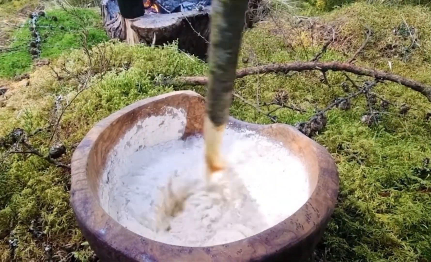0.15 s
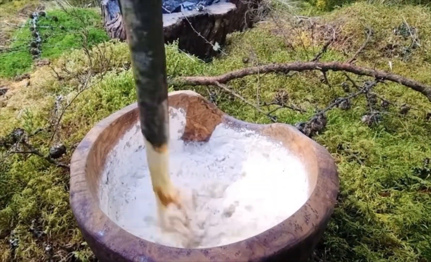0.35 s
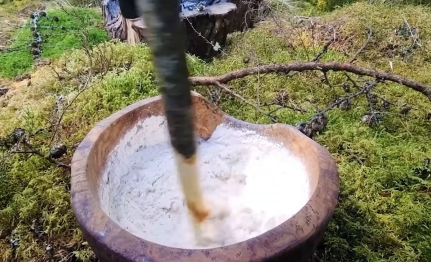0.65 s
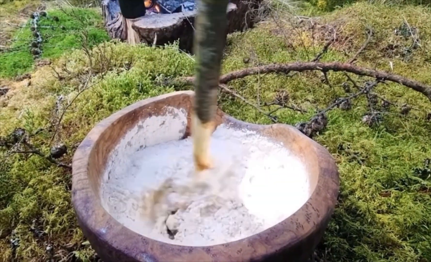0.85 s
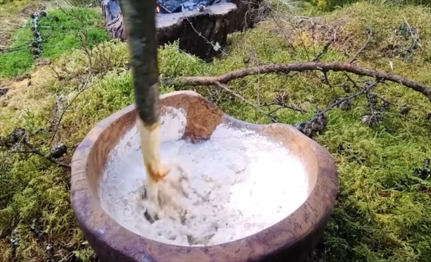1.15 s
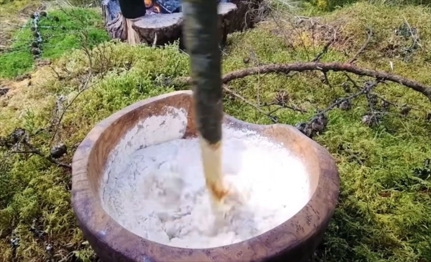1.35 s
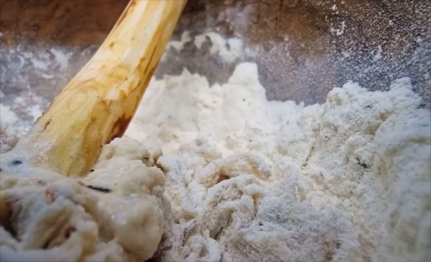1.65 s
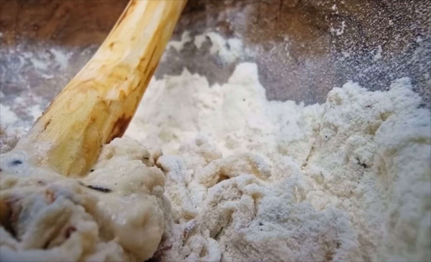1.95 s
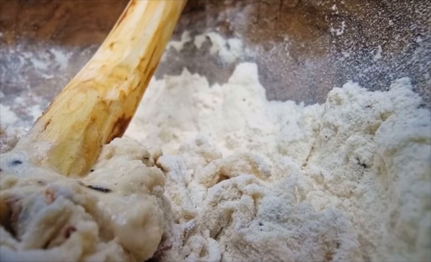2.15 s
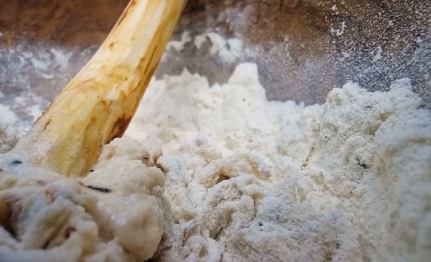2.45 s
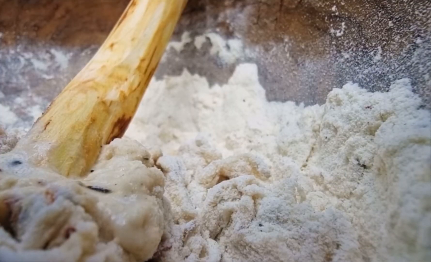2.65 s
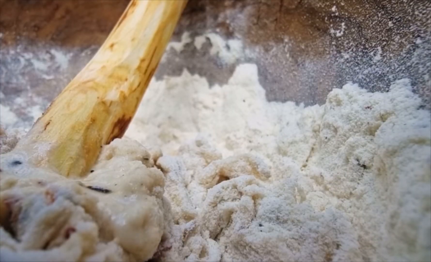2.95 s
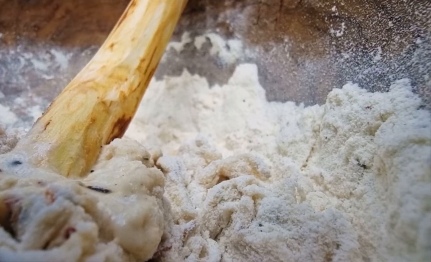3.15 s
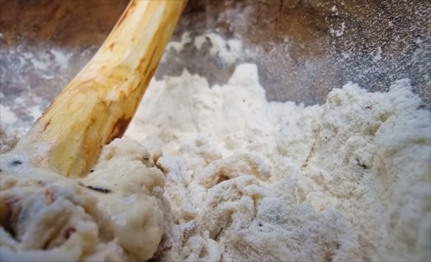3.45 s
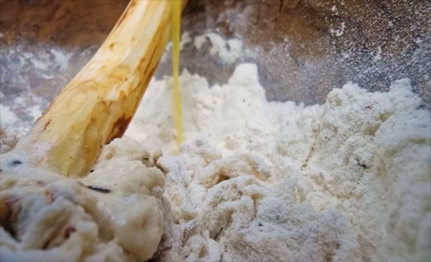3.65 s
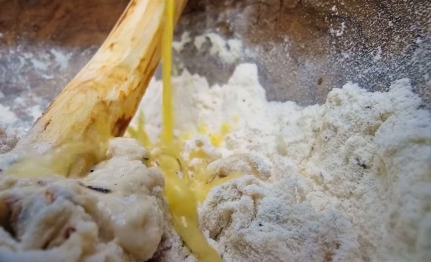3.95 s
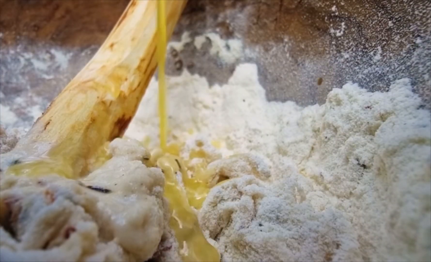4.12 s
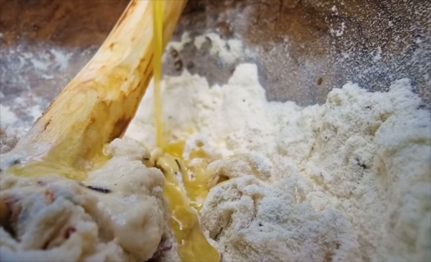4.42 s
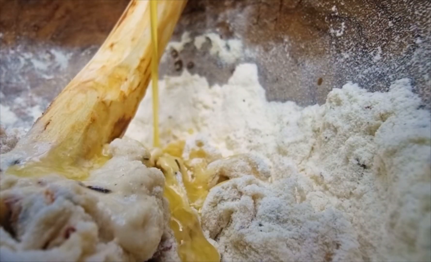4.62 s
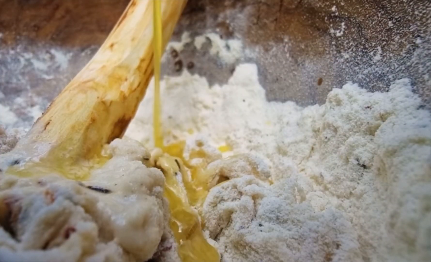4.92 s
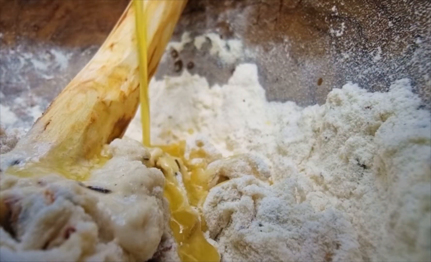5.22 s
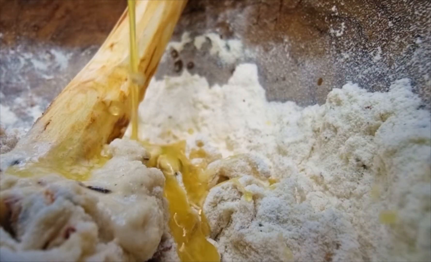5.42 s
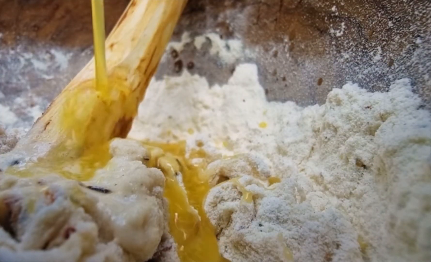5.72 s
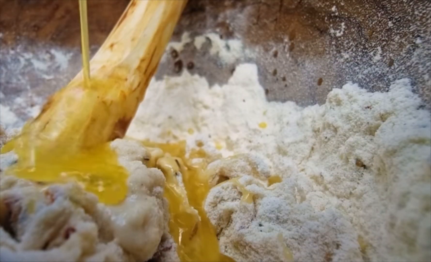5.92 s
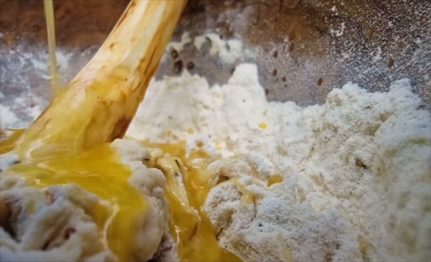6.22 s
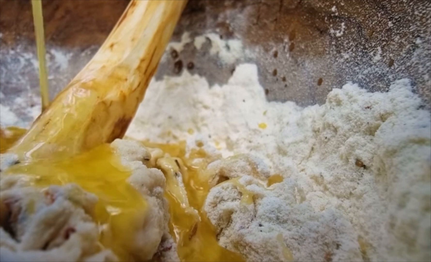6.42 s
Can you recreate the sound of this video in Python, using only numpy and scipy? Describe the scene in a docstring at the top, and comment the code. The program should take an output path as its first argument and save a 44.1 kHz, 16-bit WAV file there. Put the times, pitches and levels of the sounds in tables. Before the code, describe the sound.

A close, wide stereo scene outdoors, with a soft low hum and thin airy hiss. From 0 to 1.7 s a stick drags through sticky batter in a wooden bowl a little left: wet crackles, short scrapes and woody smacks, the strongest near 0.45 s. Faint gliding bird chirps gather between 1.2 and 1.7 s. At 1.72 s the stirring stops abruptly, and the hum drops. Sparse moist pops with a thin hollow ring follow, thickening after 2.4 s. Brighter birds chirp from about 3.1 to 3.8 s. Around 3.7 s liquid surges with quick low gulps, peaking in a hard wet pop at 3.95 s. Crackling, splattering and glugging continue slightly right, busy from 4.3 to 5.5 s, with a sharp snap at 5.3 s. After 5.8 s it thins to isolated pops and light wet trickling until about 6.6 s.

```python
"""Sticky crackles and wooden smacks come first: a stick stirs batter in a wooden bowl outdoors, a little left of
a spaced microphone pair. At 1.72 s the scene changes to liquid running from a hollow vessel on the right, with pops
and gulps. Small birds chirp over a low hum. Clicks and noise bursts ring the bowl and vessel as banks of modes,
gulps are rising sines, birds are gliding sines, and hum and hiss are shaped noise."""
import sys
import numpy as np
from scipy import signal
from scipy.fft import rfft, irfft, next_fast_len
from scipy.io import wavfile
from scipy.ndimage import uniform_filter1d

SR = 44100
rng = np.random.default_rng(int(sys.argv[2]) if len(sys.argv) > 2 else 0)


def master_out(mix):
    """Clip the mix to full scale and print it as 16-bit PCM to the path in sys.argv[1]."""
    frames = np.transpose(np.atleast_2d(mix))
    ceiling = np.clip(frames, -1, 1)
    pcm = np.round(ceiling * 32767).astype(np.int16)
    wavfile.write(sys.argv[1], SR, pcm)


def voltage_ratio(level):
    """Linear amplitude factor for a level in decibels (scalar or array-like)."""
    return 10 ** (np.asarray(level, float) / 20)


N = 290178
CHANGE_S = 1.72  # stirring stops and pouring starts
SPLAT_WIDTH_HZ = 1600  # width of each resonance that gives a pop its own pitch

# Distant air, shape of its spectrum: [f/Hz, relative density/dB per Hz]
AIR_SPECTRUM = [(20, -25.5), (40, -2.5), (75, 12), (110, 4.5), (170, -3.5), (300, -29.5), (600, -19),
                (1100, -18), (2000, -33), (3200, -29.5), (7000, -29), (10000, -46), (13000, -42),
                (16000, -36)]
# Gains of the air's two parts over time: [t/s, hum gain/dB, hiss gain/dB]
AIR_GAINS = [(0, -52.5, -41.5), (1.698, -51, -41.5), (1.74, -56.5, -42), (3.9, -58.5, -52),
             (4.1, -65.5, -39.5), (5.6, -61.5, -46.5), (6.58, -58.5, -41)]
# How alike the air is at the two microphones: [f/Hz, likeness 0..1]
AIR_LIKENESS = [(40, 0.45), (110, 1), (300, 0.02), (1000, 0.012)]
# Arched notes of a songbird: [t/s, length/s, top f/Hz, starting level/dB]
BIRD_ARCHES = [(1.162, 0.059, 4250, -52.5), (1.225, 0.066, 3077, -50), (1.338, 0.065, 4210, -51),
               (1.389, 0.047, 3100, -45.5), (1.504, 0.078, 3910, -54), (1.551, 0.085, 2965, -53),
               (1.632, 0.046, 3880, -50), (1.686, 0.026, 3640, -46), (3.133, 0.057, 4550, -35.5),
               (3.175, .04, 4240, -38), (3.184, 0.061, 3390, -47), (3.309, 0.06, 4630, -30.5),
               (3.348, 0.049, 4200, -40), (3.342, 0.037, 3300, -43), (3.495, 0.044, 4390, -33),
               (3.544, 0.039, 3350, -41), (3.763, 0.072, 3560, -37)]
# Straight gliding whistles: [t/s, length/s, start f/Hz, end f/Hz, level/dB]
BIRD_WHISTLES = [(0.782, 0.012, 6550, 5880, -49.5), (0.9, 0.034, 6680, 5550, -53),
                 (1.338, 0.11, 6820, 7160, -55.5), (1.614, 0.023, 6050, 5730, -51.5),
                 (1.642, .02, 4820, 4730, -53), (1.694, 0.017, 5000, 4680, -51),
                 (1.697, 0.012, 4000, 3950, -51), (2.471, 0.081, 4250, 4400, -50.5),
                 (2.66, 0.049, 4540, 4300, -57), (2.693, 0.028, 4900, 5100, -62),
                 (2.88, 0.041, 4400, 4100, -52), (3.441, 0.03, 4920, 4870, -46),
                 (3.642, 0.035, 2194, 3570, -37), (3.663, 0.043, 3625, 3560, -37),
                 (5.855, 0.058, 7250, 7900, -68)]
# Large gulps of air into the vessel: [t/s, peak level/dB, starting f/Hz]
LARGE_GULPS = [(3.716, -33.5, 465), (3.744, -33.5, 440), (3.79, -22, 466), (3.874, -27, 457),
               (3.944, -29, 190), (4.115, -30.5, 477), (4.363, -36, 260), (4.382, -29, 245),
               (4.399, -27, 317), (4.457, -42, 270), (4.474, -37, 250), (4.508, -35, 216),
               (4.528, -30.5, 261), (4.554, -36.5, 223), (4.765, -44, 250), (4.926, -36, 236),
               (4.956, -35.5, 220), (5.057, -40, 530), (5.064, -34, 250), (5.1, -39, 190),
               (5.143, -38, 257), (5.309, -32.5, 500), (5.83, -42, 240)]
# Batter dragged by the stick: [t/s, crackle level/dB, low slosh level/dB, treble fizz level/dB]
BATTER_LEVELS = [(0, -51, -59, -62), (.03, -46.5, -50.5, -57), (.21, -59.5, -58, -63),
                 (.34, -58.5, -59.5, -69), (.412, -48, -43.5, -60), (.474, -49, -57, -46.5),
                 (.546, -61, -58, -70), (.59, -52, -55, -63), (.742, -63.5, -56.5, -67),
                 (.808, -46.5, -53.5, -61), (.886, -61, -59, -69), (.93, -55.5, -57, -62.5),
                 (1.298, -56.5, -56.5, -66), (1.418, -53, -55, -62.5), (1.72, -55, -50.5, -68)]
# Stream leaving the vessel: [t/s, crackle level/dB, low slosh level/dB, treble fizz level/dB]
STREAM_LEVELS = [(1.76, -66, -60, -77), (2.0, -63.5, -60, -67.5), (2.07, -66, -55, -70),
                 (2.12, -49.5, -63, -62), (2.2, -63, -56.5, -65), (2.36, -59.5, -60, -69),
                 (2.6, -50, -56.5, -54.5), (2.84, -53.5, -57.5, -64), (2.96, -45, -57, -52),
                 (3.2, -46.5, -56, -55), (3.44, -41, -56, -50), (3.66, -43.5, -54, -50),
                 (3.74, -35.5, -43.5, -44.5), (3.92, -32, -44, -42.5), (4.0, -45.5, -56, -57.5),
                 (4.12, -41, -48, -43.5), (4.26, -43, -52, -55.5), (4.36, -35.5, -48, -42),
                 (4.6, -39, -47.5, -46), (4.85, -43.5, -48.5, -51), (5.3, -46.5, -51, -51.5),
                 (5.44, -37.5, -47, -43.5), (5.53, -47, -56, -51.5), (5.64, -49.5, -50.5, -54),
                 (5.78, -49.5, -50.5, -61), (5.87, -60, -61.5, -64.5), (6.04, -50, -53.5, -57.5),
                 (6.21, -53.5, -58, -63.5), (6.44, -50, -46.5, -52), (6.58, -51, -56, -58)]
# Stick smacking free: [t/s, snap level/dB, snap f/Hz, hollow ring level/dB, treble level/dB]
SMACKS = [(0.0425, -54, 3300, -52, -53), (0.084, -55, 3000, -48, -60), (0.1455, -61, 3500, -54, -62),
          (0.3067, -45, 2860, -47, -56), (0.3175, -50, 2700, -53, -65), (0.3735, -57, 3500, -40, -60),
          (0.3895, -48, 6500, -55, -58), (0.404, -37, 5350, -46, -50), (0.414, -44, 2800, -40, -48),
          (0.4533, -30, 6100, -32, -29.5), (0.6162, -45, 2960, -46, -63), (0.8057, -39.5, 3180, -62, -53),
          (0.896, -50, 5800, -66, -46), (0.9387, -38, 5750, -50, -55), (1.36, -54, 3000, -38, -68),
          (1.5444, -43, 6300, -62, -40)]
# Wet pops in the stream: [t/s, snap level/dB, snap f/Hz, hollow ring level/dB, treble level/dB]
STREAM_POPS = [(1.8066, -44, 3330, -44, -57), (1.9086, -46.5, 5100, -66, -71),
               (1.9696, -39, 4690, -49, -74), (2.035, -44, 5800, -56, -67), (2.0917, -41.5, 7400, -44, -42),
               (2.1136, -34, 3300, -57, -52), (2.165, -40.5, 5840, -55, -55), (2.1989, -54, 3060, -63, -46),
               (2.2473, -47, 6700, -62, -62), (2.2726, -44.5, 3160, -59, -71),
               (2.3256, -53, 3600, -56, -46), (2.36, -40.5, 7300, -40, -64), (2.374, -27.5, 3800, -46, -53),
               (2.3944, -44, 3160, -60, -53), (2.4396, -38.5, 3080, -54, -70),
               (2.4883, -35.5, 2970, -35.5, -45), (2.5095, -35, 3260, -47, -43),
               (2.5245, -35, 3100, -33.5, -50), (2.612, -42, 2860, -35, -47), (2.7247, -40, 2960, -38, -37),
               (2.736, -47, 2880, -61, -61), (2.7928, -44, 3000, -38.5, -38), (2.805, -44, 2440, -57, -61),
               (2.8812, -32.5, 6740, -36, -52), (2.948, -51, 2960, -36, -52),
               (2.997, -36.5, 7040, -37, -53), (3.058, -35.5, 2300, -39, -49),
               (3.076, -36.5, 2300, -47, -41), (3.1023, -33.5, 7000, -50, -51),
               (3.2174, -27, 7040, -42, -58), (3.2317, -27.5, 3700, -50, -68),
               (3.2396, -37, 3180, -50, -68), (3.262, -30.5, 6940, -30.5, -65),
               (3.411, -42, 7450, -48, -50), (3.428, -36, 2480, -53, -48), (3.479, -33, 6500, -33.5, -54),
               (3.571, -42, 6500, -52, -57), (3.7524, -32, 3700, -39, -36), (3.768, -27, 3280, -42, -27.5),
               (3.786, -31, 2880, -29, -40), (3.7945, -34, 3600, -31, -39), (3.8225, -34, 5500, -48, -35),
               (3.8525, -37, 4000, -33, -38), (3.8813, -23.5, 3900, -24.5, -37),
               (3.887, -32, 5000, -46, -35), (3.9145, -39, 3500, -39, -34),
               (3.9468, -11, 3870, -19.5, -25.5), (4.1684, -33.5, 3800, -37, -63),
               (4.288, -48, 7400, -50, -36), (4.2999, -27, 3800, -27, -37), (4.363, -33, 7600, -32, -27),
               (4.3834, -36, 3600, -26.5, -24.5), (4.3996, -20, 3730, -45, -27.5),
               (4.412, -35, 5000, -44, -42), (4.445, -27, 5540, -55, -42), (4.4571, -20, 4050, -27.5, -29),
               (4.474, -35, 2330, -56, -30), (4.5086, -30, 4570, -29.5, -29),
               (4.5292, -25.5, 2380, -36, -29), (4.5517, -35, 3560, -30, -38),
               (4.5718, -31, 4430, -42, -24.5), (4.5994, -30, 3570, -50, -38),
               (4.6142, -30.5, 2390, -43, -38), (4.6713, -44, 2370, -51, -40),
               (4.7073, -34.5, 2430, -53, -53), (4.7348, -21, 2560, -28.5, -62),
               (4.745, -31, 3060, -53, -53), (4.764, -29, 5660, -36, -33), (4.8247, -31.5, 5660, -48, -42),
               (4.8524, -34, 2900, -57, -33), (4.8758, -27, 6640, -33, -30),
               (4.8865, -34.5, 2400, -40, -24.5), (4.9056, -29.5, 6400, -32, -30),
               (4.9506, -51, 7450, -36, -23.5), (4.9631, -30, 3540, -53, -48), (5.017, -34, 3300, -45, -39),
               (5.0274, -34, 3830, -29, -43), (5.041, -36, 3000, -38, -55), (5.0525, -41, 7500, -52, -42),
               (5.0614, -24, 3550, -22.5, -27.5), (5.0996, -36, 4150, -52, -47),
               (5.111, -33, 6500, -57, -53), (5.1344, -31, 3000, -50, -56),
               (5.1452, -22.5, 5250, -26, -27.5), (5.2051, -50, 2900, -27.5, -58),
               (5.26, -36, 3700, -44, -55), (5.289, -35, 3000, -33, -44), (5.314, -14.5, 6500, -32, -58),
               (5.3307, -32, 5300, -59, -39), (5.348, -32, 7350, -53, -45), (5.3875, -23, 5370, -42, -32.5),
               (5.394, -42, 3000, -32, -55), (5.4164, -26, 5550, -50, -39), (5.4372, -24, 4100, -52, -46),
               (5.446, -22.5, 3980, -50, -47), (5.461, -26.5, 3850, -37, -53),
               (5.487, -28.5, 4300, -51, -33), (5.5, -33, 3500, -50, -55), (5.5149, -30, 3970, -34, -57),
               (5.5268, -28.5, 6600, -49, -37), (5.629, -40, 5200, -48, -54), (5.6425, -31, 5250, -30, -27),
               (5.664, -41, 3500, -37, -43), (5.705, -54, 3000, -43, -59), (5.7374, -37, 5970, -58, -38.5),
               (5.7636, -34, 3950, -40, -45), (5.7745, -42, 4500, -57, -46), (5.7992, -53, 2800, -38, -44),
               (5.8175, -39, 3100, -39, -44), (5.9841, -43, 2920, -36.5, -54),
               (5.9907, -33, 3040, -34, -38), (6.2604, -46.5, 2400, -29.5, -61),
               (6.274, -38, 2930, -35.5, -61), (6.3581, -38.5, 3970, -60, -56),
               (6.3781, -40, 3700, -47, -31.5), (6.4042, -45, 2950, -35, -45),
               (6.435, -39, 5330, -32.5, -36.5)]
# Modes of the wooden bowl: [f/Hz, width/Hz, relative level/dB]
BOWL_MODES = [(278, 990, -31), (563, 118, 5), (1192, 115, -4.5), (2010, 1350, -4.5), (3330, 1010, 4.5),
              (4100, 1640, 3.5), (6500, 3800, 0.5), (10500, 5970, 4), (11830, 7500, 3)]
# Modes of the hollow vessel: [f/Hz, width/Hz, relative level/dB]
VESSEL_MODES = [(233, 2950, -4), (540, 130, -9), (900, 200, -16), (1025, 60, 2), (1130, 200, -15),
                (1580, 150, -14), (2330, 484, -7), (2800, 287, 4.5), (3300, 658, 1), (4060, 1024, 0),
                (5100, 760, -2), (6650, 1370, -7.5), (11980, 1280, -18), (13170, 2680, -19)]
# Bands of crackle, hollow ring, slosh and fizz, one row each: [lower f/Hz, upper f/Hz]
PART_BANDS = [(1850, 8500), (860, 1750), (110, 820), (8500, 16000)]
# Drifting band and thin ring as the vessel tips: [t/s, band f/Hz, band level/dB, thin ring level/dB]
MOUTH_DRIFT = [(1.72, 2310, -10, 5), (2.45, 2220, -20, 9.5), (2.8, 1320, 2, -8), (3.6, 1330, 0, -33),
               (3.75, 1630, 11, -24), (4.3, 1640, 3.5, -32), (4.6, 2390, 4, -32), (5.05, 2400, 0.5, -25),
               (5.4, 1560, 6, -23), (5.75, 1930, 1, -21), (6.58, 1960, -2, -15)]
# Phase by which the left microphone leads (negative: lags), by source place: [f/Hz, phase/rad]
BOWL_PHASE = [(0, 0.75), (1380, 3.06), (2930, 5.44), (16400, 31)]
VESSEL_PHASE = [(0, 0), (600, -.6), (930, -2.9), (1050, -2.7), (1200, -2.6), (1400, -3.1), (1900, -3.2),
                (2030, -6), (2420, -6.5), (2620, -9.1), (3220, -9.7), (3650, -12.1), (4150, -13),
                (6290, -21.6), (10100, -38), (16400, -58)]
BIRD_PHASE = [(0, 1.5), (16400, -17)]
# Gain of the left microphone for the vessel: [f/Hz, left-right level/dB]
VESSEL_LEFT_GAIN = [(60, 29), (180, -6.5), (550, 2), (760, 4), (1000, 1), (1800, 2), (2500, -1.5),
                    (4970, -1.5), (15000, -2.5)]


def evened(x):
    """Scales to rms 1."""
    return x / np.sqrt(np.mean(x ** 2) + 1e-20)


def read(points, hz):
    """Reads a spectrum on a log-frequency axis."""
    f, value = np.transpose(points)
    return np.interp(np.log(hz + 1), np.log(f + 1), value)


def add(mix, s, sound):
    """Mixes a sound in at time s."""
    part = mix[..., max(round(s * SR), 0):][..., :sound.shape[-1]]
    part += sound[..., :part.shape[-1]]


def to_pair(x, lead, scatter_db, scatter_s, scatter_hz, balance=((0, 0), (1, 0)), count=11):
    """Spaced pair: path difference as phase, and separate treble reflections that shift as things move."""
    t = np.arange(0, scatter_s, 1 / SR)
    echoes = rng.standard_normal((count, 2, len(t)))
    echoes *= voltage_ratio(-60 * t / scatter_s) * (t > .0003)
    highpass = signal.butter(6, scatter_hz, "highpass", fs=SR, output="sos")
    echoes = signal.sosfilt(highpass, echoes)
    echoes *= voltage_ratio(scatter_db) / np.linalg.norm(echoes, axis=2, keepdims=True)
    place = np.arange(N) / SR / .018 % count  # one set of reflections hands over to the next every 18 ms
    heard = x
    for k, taps in enumerate(echoes):
        distance = np.minimum(abs((place - k + 1) % count - 1), 1)
        share = np.cos(np.pi / 2 * distance)
        heard = heard + signal.oaconvolve(x * share, taps, axes=1)[:, :N]
    size = next_fast_len(N)
    hz = np.fft.rfftfreq(size, 1 / SR)
    turn = np.exp(1j * np.interp(hz, *np.transpose(lead))) * voltage_ratio(read(balance, hz))
    left = irfft(rfft(heard[0], size) * turn, size)[:N]
    return np.array([left, heard[1]])


def air():
    """Distant low hum and outdoor hiss: shaped noise, lumpy in time and frequency, partly alike at both mics."""
    frames, hz = N // 512 + 5, np.fft.rfftfreq(2048, 1 / SR)
    a, b, c, d, lumps = rng.standard_normal((frames, len(hz), 5)).T
    lumps_db = 1.6 * evened(uniform_filter1d(uniform_filter1d(lumps, 6, 0), 6, 1))
    same = np.clip(read(AIR_LIKENESS, hz), -1, 1)[:, None]
    left = a + 1j * b
    right = same * left + np.sqrt(1 - same ** 2) * (c + 1j * d)
    z = np.array([left, right]) * voltage_ratio(read(AIR_SPECTRUM, hz)[:, None] + lumps_db)
    low = (hz < 200)[:, None]
    hum, hiss = (signal.istft(z * part, nperseg=2048, noverlap=1536)[1][:, :N] for part in (low, ~low))
    s, hum_db, hiss_db = np.transpose(AIR_GAINS)
    t = np.arange(N) / SR
    both = voltage_ratio(np.interp(t, s, hum_db)) * hum + voltage_ratio(np.interp(t, s, hiss_db)) * hiss
    return both / np.std(hum + hiss) * voltage_ratio([[.6], [-.6]])  # left a little louder


def birds():
    """Short gliding whistles, a little hoarse, blurred by echoes among the trees."""
    scoop, rise = 0.1516, 0.145  # starts this share below the top, climbs in this share of its length
    rest_hz, bend, fade_db = 3000, 1.4, -8  # then sinks to rest_hz and fades
    notes = []
    for s, length, top_hz, db in BIRD_ARCHES:
        u = np.arange(0, length, 1 / SR) / length
        climb_hz = top_hz * (1 - scoop * np.exp(-u / rise))
        notes.append((s, db + fade_db * u, climb_hz - (top_hz - rest_hz) * u ** bend))
    for s, length, start_hz, end_hz, db in BIRD_WHISTLES:
        notes.append((s, db, np.linspace(start_hz, end_hz, round(length * SR))))
    out = np.zeros(N)
    for s, db, hz in notes:
        tone = np.sqrt(2) * np.sin(2 * np.pi * np.cumsum(hz) / SR)
        add(out, s, voltage_ratio(db) * tone * signal.windows.tukey(len(hz), .4))
    flutter = uniform_filter1d(uniform_filter1d(rng.standard_normal(N), 35), 30)
    hoarse = 1 + 0.45 * evened(flutter)
    return to_pair(np.array([out, out]) * hoarse, BIRD_PHASE, scatter_db=1.5, scatter_s=0.12, scatter_hz=1490)


def gulps():
    """Large bubbles, and many small ones that follow the slosh: a soft low ring that rises near the surface."""
    plops, lowest_hz, highest_hz = 260, 135, 416  # small gulps at chance times
    when, pitch, size = rng.random((plops, 3)).T
    when = CHANGE_S + when * (N / SR - CHANGE_S)
    slosh_db = np.interp(when, *np.transpose(STREAM_LEVELS)[[0, 2]])
    small_db = slosh_db - 3.5 - 8.5 * np.log(1 - size) / 2  # a few are much louder
    small_hz = lowest_hz * (highest_hz / lowest_hz) ** pitch
    # the last column is the time to the peak, in s
    rows = [(*row, 0.0013) for row in LARGE_GULPS] + list(zip(when, small_db, small_hz, plops * [0.00056]))
    out, t = np.zeros((2, N)), np.arange(3000) / SR
    pan_db = -5.5 * np.array([[.5], [-.5]])  # right louder
    for (s, db, hz, swell_s), turn in zip(rows, rng.uniform(-3.1, 2.16, (len(rows), 2, 1))):
        swell = t / swell_s * np.exp(1 - t / swell_s)
        tone = np.sin(2 * np.pi * hz * t * (1 + 8 * t) + turn)
        add(out, s, voltage_ratio(db + pan_db) * swell * tone)
    return signal.sosfilt(signal.butter(2, 60, "highpass", fs=SR, output="sos"), out)


def ring(hz, width_hz, size=2048):
    """One dying mode whose spectrum peaks at gain 1."""
    t = np.arange(size) / SR
    return 2 * np.pi * width_hz / SR * np.exp(-np.pi * width_hz * t) * np.sin(2 * np.pi * hz * t)


def parts(modes):
    """The container's response to a click, split into crackle, hollow ring, slosh and fizz."""
    body = sum((-1) ** k * voltage_ratio(db) * ring(hz, width) for k, (hz, width, db) in enumerate(modes))
    return [signal.sosfilt(signal.butter(4, edges, "bandpass", fs=SR, output="sos"), body) for edges in PART_BANDS]


def crackle(rows, modes, ring_law, per_s, spread_db, hiss, flutter_db, shared):
    """Sticky threads and bubbles break in clumps over a wet hiss; the hollow ring follows the crackle level."""
    s, crackle_db, slosh_db, fizz_db = np.transpose(rows)
    # ring_law: dB at a crackle level of -45 dB, then dB per dB of crackle
    ring_db = ring_law[0] + ring_law[1] * (crackle_db + 45)
    slow = uniform_filter1d(uniform_filter1d(rng.standard_normal((5, N)), 260), 200)
    size_db = spread_db * np.minimum(rng.exponential(1, N), 3)  # at most three spreads
    size = voltage_ratio(size_db) * rng.standard_normal(N)
    clicks = size * (rng.random(N) < per_s / SR)
    t, out = np.arange(N) / SR, 0
    for db, part, own in zip((crackle_db, ring_db, slosh_db, fizz_db), parts(modes), slow[1:]):
        reach = voltage_ratio(2.04 * rng.standard_normal(N))  # each click favours some parts of the ring
        clumps = voltage_ratio(flutter_db * evened(shared * slow[0] + own))
        drive = (evened(clicks * reach) + hiss * rng.standard_normal(N)) * clumps
        out = out + voltage_ratio(np.interp(t, s, db)) * evened(signal.oaconvolve(drive, part)[:N])
    return out


def pops(rows, modes, pan_law, burst_s, own, glug):
    """Each pop is a short noise burst with a pitch of its own, and its push sets the container ringing."""
    snap, hollow, slosh, fizz = parts(modes)
    out, t = np.zeros((2, N)), np.arange(400) / SR
    thin = signal.butter(4, 2000, "highpass", fs=SR, output="sos")
    middle_s = 3 * burst_s
    # the film tears at once, in 0.42 of the decay time, then lets go
    push = np.exp(np.minimum((t - middle_s) / 0.42, middle_s - t) / burst_s)
    boom = np.roll(hollow + glug * slosh, round(middle_s * SR))
    for (s, snap_db, hz, ring_db, fizz_db), noise in zip(rows, rng.standard_normal((len(rows), 400))):
        # pan_law: left-right dB at 4 kHz, dB per octave of pitch, dB of chance
        pan_db = np.dot(pan_law, (1, np.log2(hz / 4000), noise[-1]))
        mode = ring(hz, SPLAT_WIDTH_HZ, size=1024)
        pitched = evened(signal.sosfilt(thin, np.convolve(mode, mode)))
        voices = [evened(snap[:-1]) + own * pitched, fizz]
        sounds = [signal.fftconvolve(noise * push, voice)[:len(boom)] for voice in voices]
        sounds.append(np.sign(noise[0]) * boom)
        tops = [np.sqrt(uniform_filter1d(x ** 2, 80).max()) for x in sounds]  # loudest short-time rms
        levels = (snap_db, fizz_db, ring_db)
        tear, spray, knock = (voltage_ratio(db) * x / top for db, x, top in zip(levels, sounds, tops))
        pans = voltage_ratio(np.outer((.5, -.5), (pan_db, pan_law[0])))  # the ring stays where the container is
        # the burst peaks 0.8 ms after the listed time
        add(out, s + 0.0008 - middle_s, pans[:, :1] * (tear + spray) + pans[:, 1:] * knock)
    return out


def stirring():
    """The stick drags through the batter and smacks free, ringing the bowl on the left."""
    drag = crackle(BATTER_LEVELS, BOWL_MODES, ring_law=(-53, 0.62), per_s=570, spread_db=5.0, hiss=1.0,
                   flutter_db=-0.5, shared=0.2)
    smacks = pops(SMACKS, BOWL_MODES, pan_law=(4.9, 1, 1.6), burst_s=0.0012, own=1.9, glug=0.33)
    sound = drag * voltage_ratio([[1.2], [-1.2]]) + smacks
    pair = to_pair(sound, BOWL_PHASE, scatter_db=-1.0, scatter_s=0.03, scatter_hz=925)
    return pair * (np.arange(N) < CHANGE_S * SR)


def resonate(x, hz, width_hz):
    """A resonance of gain 1 that follows the curve hz."""
    turn, r = np.exp(2j * np.pi * np.cumsum(hz) / SR), np.exp(-np.pi * width_hz / SR)
    return 2 * (turn * signal.lfilter([1 - r], [1, -r], x / turn)).real


def mouth(x):
    """As the vessel tips, one band sinks or swells and a thin ring, alike at both microphones, changes level."""
    s, *cols = np.transpose(MOUTH_DRIFT)
    hz, band_db, ring_db = (np.interp(np.arange(N) / SR, s, col) for col in cols)
    band = resonate(resonate(x, hz, width_hz=700), hz, width_hz=700)
    thin = voltage_ratio(ring_db) * resonate(x.mean(0), np.full(N, 3060), width_hz=70)
    return x + (voltage_ratio(band_db) - 1) * band, thin


def pouring():
    """The stream crackles and pops out of the vessel on the right, coloured by its mouth."""
    stream = crackle(STREAM_LEVELS, VESSEL_MODES, ring_law=(-48.5, 1.05), per_s=1300, spread_db=3.0, hiss=1.0,
                     flutter_db=2.5, shared=5.4)
    wet = pops(STREAM_POPS, VESSEL_MODES, pan_law=(-0.8, -3.5, 2), burst_s=.00045, own=4.3, glug=0.71)
    sound, thin = mouth(stream + wet)
    pair = to_pair(sound, VESSEL_PHASE, scatter_db=0.5, scatter_s=.006, scatter_hz=2360, balance=VESSEL_LEFT_GAIN)
    return (thin + pair) * (np.arange(N) >= CHANGE_S * SR)


def scene():
    """All sources at the two microphones."""
    return air() + birds() + gulps() + stirring() + pouring()


def band_limit(x):
    """A steep low-pass at the top of the band."""
    return signal.sosfilt(signal.butter(12, 16810, fs=SR, output="sos"), x)


def record(dry):
    """A softly saturating microphone input, then a band limit at 15.9 kHz."""
    edge = signal.firwin(255, 15900, window=("kaiser", 6), fs=SR)
    finished = signal.oaconvolve(np.tanh(dry), edge[None], "same")
    return band_limit(finished)


dry = scene()
out = record(dry)
master_out(out)
```